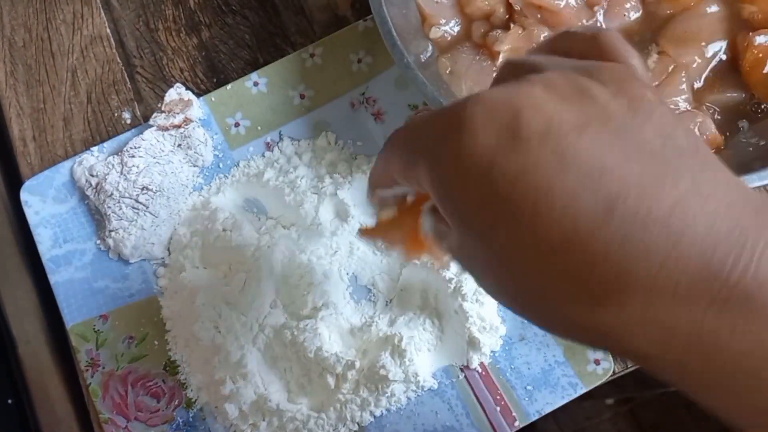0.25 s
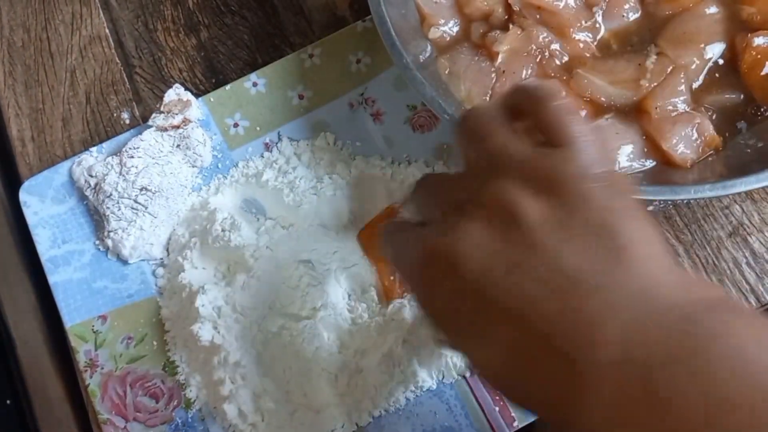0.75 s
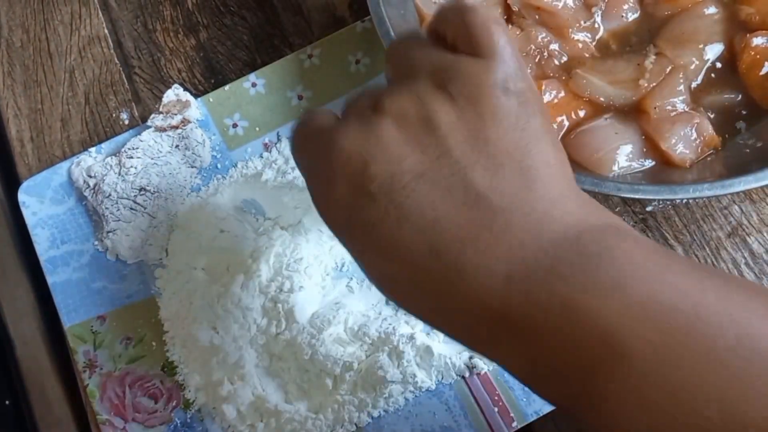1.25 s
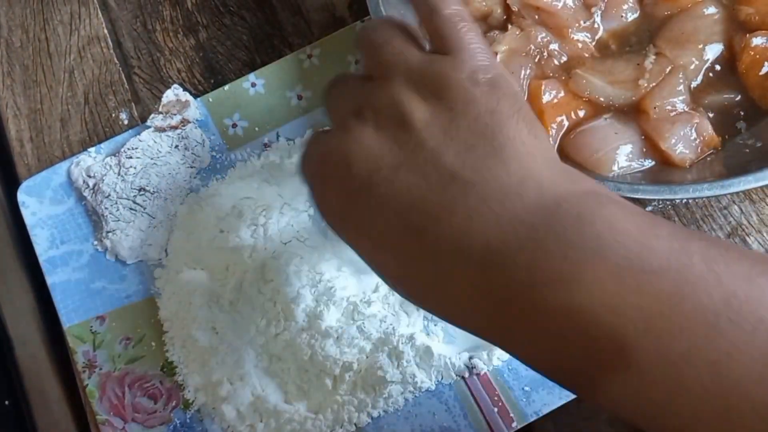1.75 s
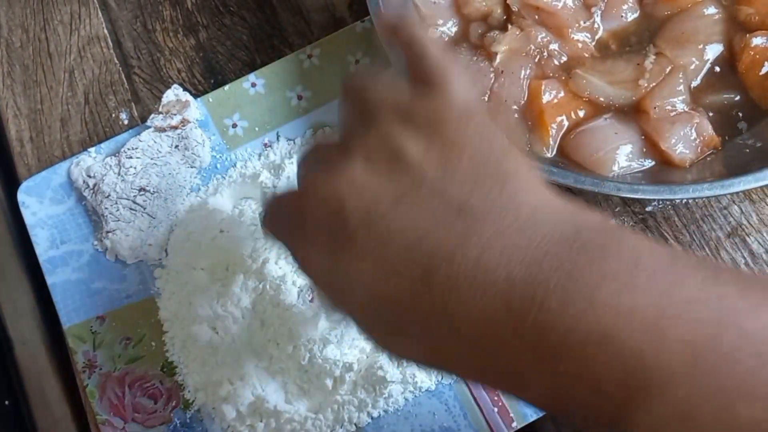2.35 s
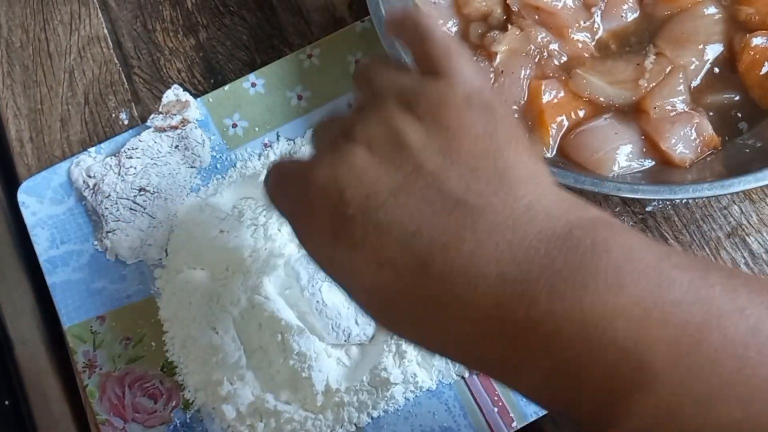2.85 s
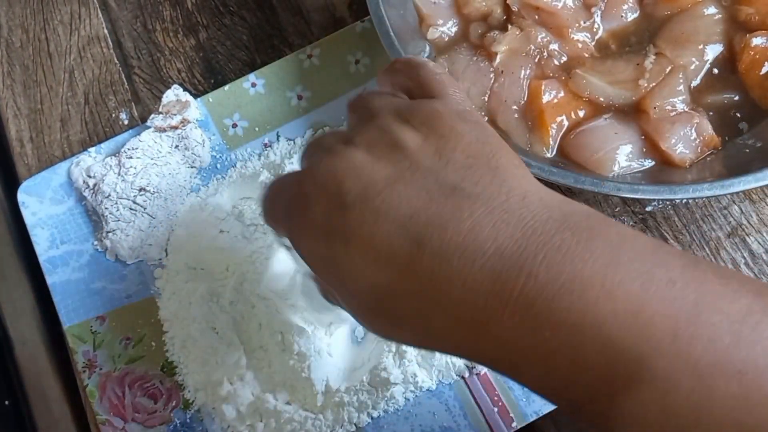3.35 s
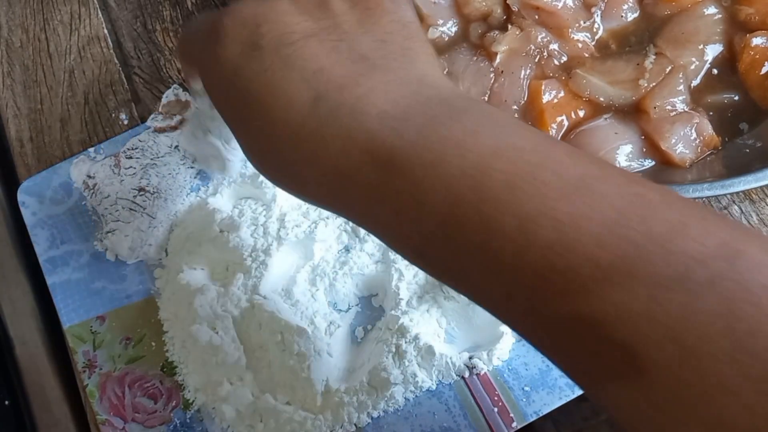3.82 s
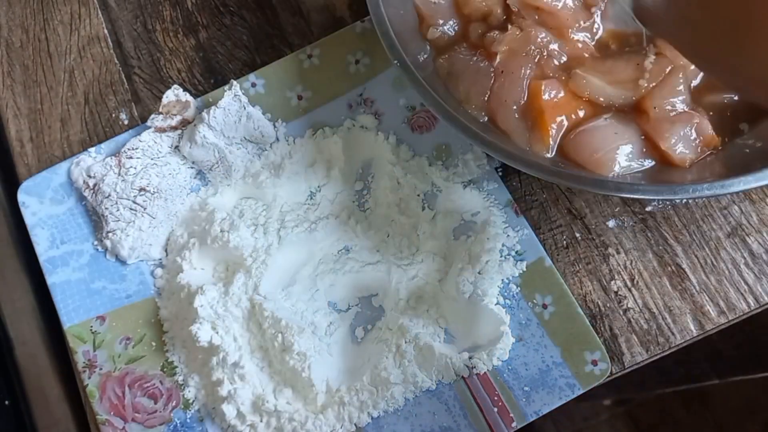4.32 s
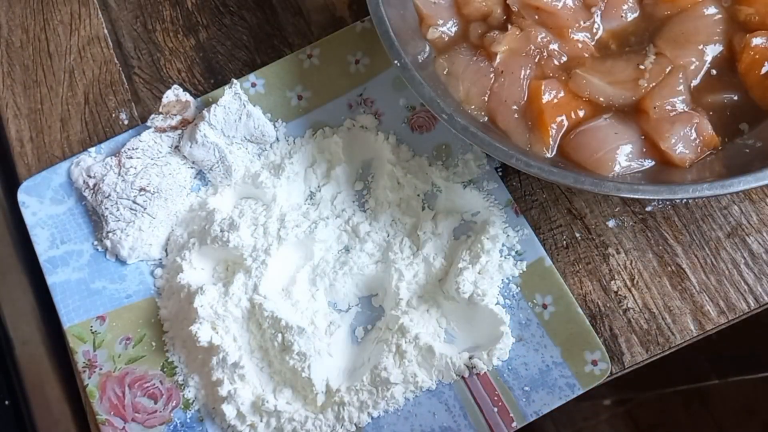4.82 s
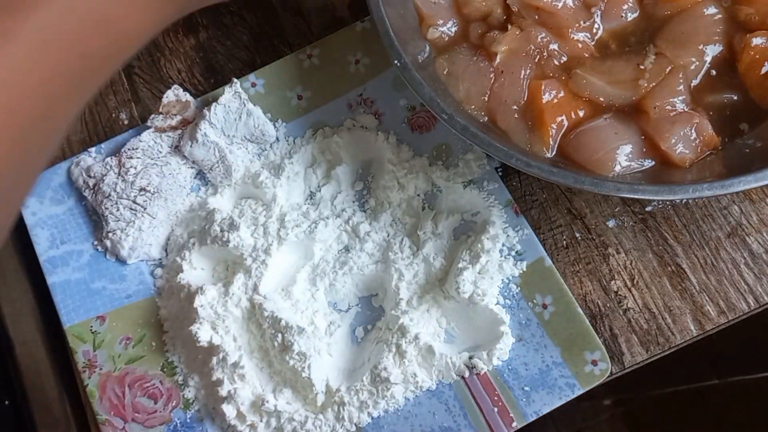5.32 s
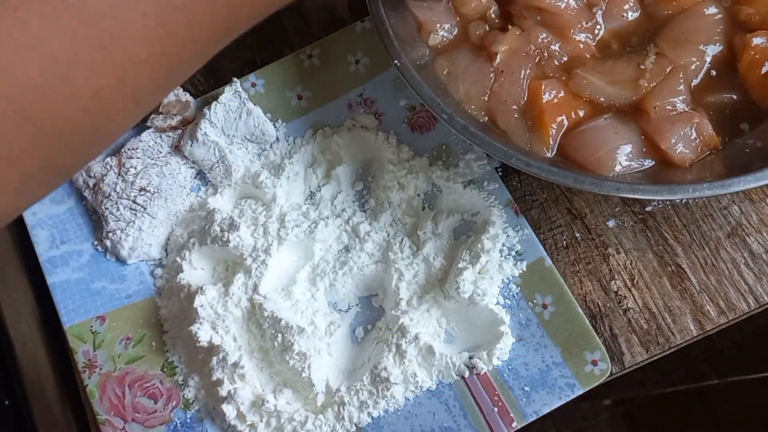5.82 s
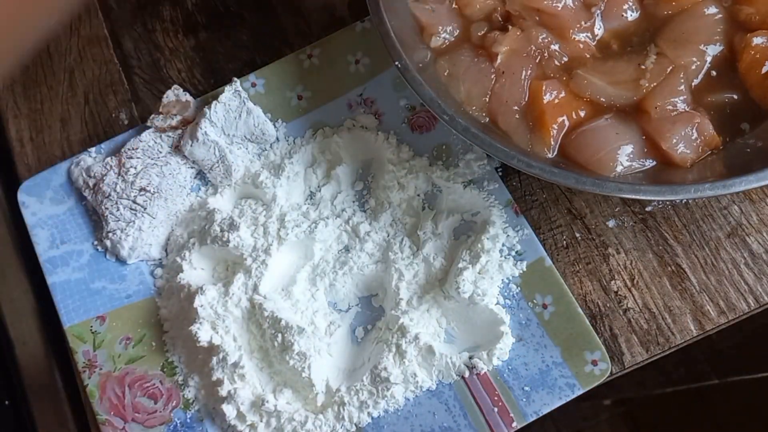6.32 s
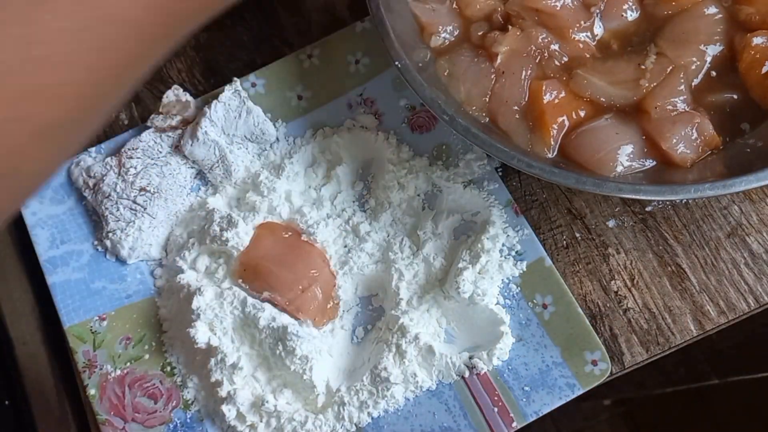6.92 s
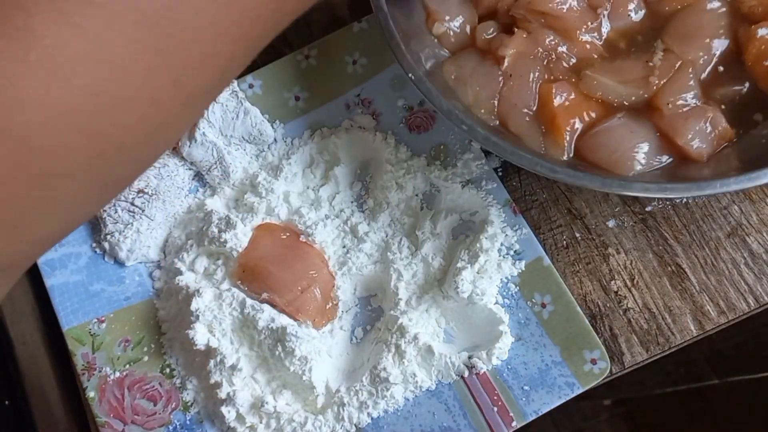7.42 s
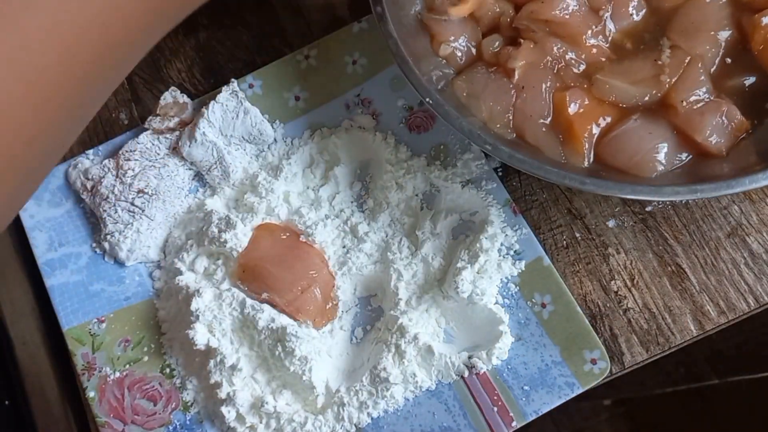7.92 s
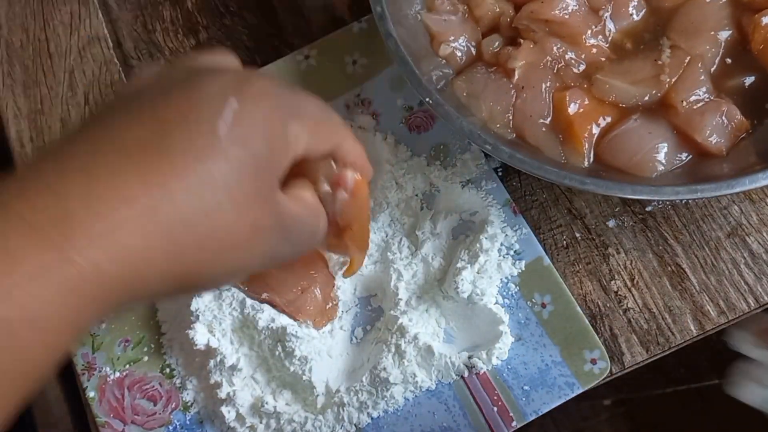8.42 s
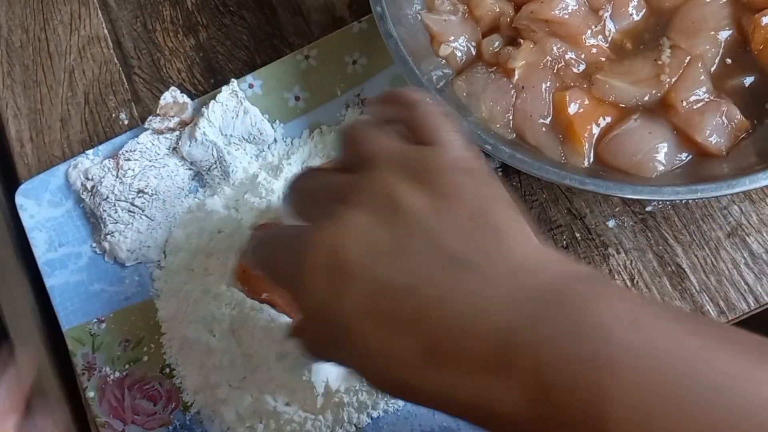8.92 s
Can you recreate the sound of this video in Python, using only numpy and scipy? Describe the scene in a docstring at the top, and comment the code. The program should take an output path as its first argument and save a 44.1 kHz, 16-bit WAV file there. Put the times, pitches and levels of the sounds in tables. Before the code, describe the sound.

Sharp snaps and crackles from a nearby pan of hot oil, over the low hum of a vehicle and traffic outside.

```python
"""A home kitchen, a stereo pair near a pan of hot oil that stands a little to the left. From the start steam
bubbles burst with a snap and a short ring, trapped water cracks, and the hard walls answer; outside,
tyres fade and traffic rumbles. By 3 s an engine has drawn near and drones through the walls. Past 5 s
a droplet sizzles away and the hum swells. Around 7 s the engine leaves, dull knocks come from the work
table, then another sizzle. The oil spits to the end."""
import sys
import numpy as np
from scipy import signal
from scipy.fft import rfft, irfft
from scipy.io import wavfile
from scipy.ndimage import uniform_filter1d

SR = 44100
rng = np.random.default_rng(int(sys.argv[2]) if len(sys.argv) > 2 else 0)


def master(y):
    """Save y as 16-bit WAV."""
    cut = np.clip(np.atleast_2d(y).T, -1, 1)
    pcm = np.round(cut * 32767)  # scale
    wavfile.write(sys.argv[1], SR, pcm.astype(np.int16))


N = 404397
BURST_N, ROOM_N = 2048, 16384  # samples in one dry burst, and in the room's answer
T, BURST_T = np.arange(N) / SR, np.arange(BURST_N) / SR
COLOUR_HZ = np.fft.rfftfreq(2 * ROOM_N, 1 / SR)


def amp(db):
    """Decibels to gain."""
    return 10 ** (np.asarray(db) / 20)


def unit_rms(x):
    """Scales to rms 1."""
    return x / np.sqrt(np.mean(x ** 2) + 1e-20)


def curve(points, hz):
    """Reads a table on a log-frequency axis."""
    f, value = np.transpose(points)
    return np.interp(np.log(hz + 1), np.log(f + 1), value)


def add(mix, s, sound):
    """Mixes a stereo sound in at time s."""
    part = mix[:, max(round(s * SR), 0):][:, :sound.shape[1]]
    part += sound[:, :part.shape[1]]


def lean(left_db):
    """Gains that put the left microphone left_db above the right."""
    return amp([[left_db / 2], [-left_db / 2]])


def swell(peak_s, rise_s, fall_s):
    """A bell-shaped hump of height 1 that builds up to peak_s and dies away."""
    t = T - peak_s
    return np.exp(-.5 * (t / np.where(t < 0, rise_s, fall_s)) ** 2)


def wander(knots):
    """A slow drift through evenly spaced random values."""
    return np.interp(T, np.linspace(0, N / SR, knots), rng.standard_normal(knots))


# Diffuse sound at the pair, alike only in the bass: f/Hz, left-right correlation
COHERENCE = [(30, 0.98), (130, 0.94), (250, 0.79), (500, 0.61), (900, 0), (3000, 0), (15000, 0)]
def diffuse_noise(spectrum):
    """Coloured noise of rms 1 that reaches the microphones from all sides."""
    hz = np.fft.rfftfreq(N, 1 / SR)
    left, other = rfft(rng.standard_normal((2, N)))
    alike = curve(COHERENCE, hz)
    right = alike * left + np.sqrt(1 - alike ** 2) * other
    return unit_rms(irfft(np.array([left, right]) * amp(curve(spectrum, hz)), N))


# Reverberation between the hard walls: f/Hz, T60/s
ROOM_DECAY = [(600, 0.64), (1500, 0.4), (4000, 0.27), (10000, 0.26), (15000, 0.25)]
def kitchen(direct=0.11, early=0.58, early_s=0.0054, lead_s=0.00034):
    """Frequency response from one spot to the pair: direct sound, close reflections, a dying tail."""
    t = np.arange(ROOM_N) / SR
    reflections = rng.standard_normal((2, ROOM_N)) * (rng.random((2, ROOM_N)) < .25)
    hz, frame_s, bands = signal.stft(reflections, SR, nperseg=256)
    bands *= amp(-60 * frame_s / curve(ROOM_DECAY, hz)[:, None])
    response = signal.istft(bands, SR, nperseg=256)[1][:, :ROOM_N]
    response *= 1 + early * np.exp(-t / early_s)
    response /= np.linalg.norm(response, axis=1, keepdims=True)
    response[0, 0] += direct
    response[1, round(lead_s * SR)] += direct  # the right microphone is farther away
    return rfft(response, 2 * ROOM_N)


def at_microphones(sound, room, colour):
    """A short sound, coloured and carried across the room, with rms 1 over its first 30 ms."""
    wet = irfft(rfft(sound, 2 * ROOM_N) * room * colour)[:, :ROOM_N]
    return wet / np.sqrt(np.mean(wet[:, :round(.03 * SR)] ** 2))


# Still air of the kitchen: f/Hz, relative density/dB
AIR_COLOUR = [(290, -39), (500, -3.5), (1420, -6), (1770, -15), (1930, 1), (2810, -5.5), (5310, -3),
              (6610, -6.5), (14900, -6), (16000, -21.5)]
def room_tone(level_db=-58.56):
    """A faint, steady hiss all around the microphones."""
    return amp(level_db) * diffuse_noise(AIR_COLOUR)


# Swells of traffic outside: peak t/s, road noise level/dB, rumble level/dB, half length/s
TRAFFIC_SWELLS = [(0, -49.5, -37.5, 0.34), (1.59, -53.5, -39, 0.087), (2.042, -64, -39, 0.1),
                  (3.06, -48.5, -38, 1), (4.796, -48.5, -44.5, 0.18), (6.22, -49, -38.5, 0.64),
                  (6.68, -60, -38, 0.094), (7.14, -62, -38, 0.082), (7.93, -56.5, -42, 0.29)]
# Road noise and rumble as they arrive indoors: f/Hz, relative density/dB
ROAD_COLOUR = [(130, -16), (180, -6), (210, 3), (260, -2), (320, -1.5), (420, -9), (700, -13.5),
               (1200, -20.5), (2500, -22), (6000, -38), (15000, -45)]
RUMBLE_COLOUR = [(20, -34), (38, -30), (50, -15.5), (68, -9.5), (75, 1), (90, 5), (101, 2), (111, 2),
                 (130, -1.5), (142, -17.5), (170, -22), (230, -47)]
def traffic(trim_db=-1, falloff=1.3, steady_s=0.11, waver_db=1.75):
    """Road noise and rumble swell and fade behind the walls."""
    peak_s, road_db, rumble_db, half_s = np.transpose(TRAFFIC_SWELLS)
    from_peak = (T[:, None] - peak_s) / half_s
    power_share = np.hypot(1, from_peak) ** (-2 * falloff)  # 1 at the top of each swell
    road = np.sqrt(power_share @ amp(road_db) ** 2) * diffuse_noise(ROAD_COLOUR)
    rumble = diffuse_noise(RUMBLE_COLOUR)
    rumble /= np.sqrt(uniform_filter1d((rumble ** 2).mean(0), round(steady_s * SR)))  # even out its level
    rumble *= amp(waver_db * wander(knots=70)) * np.sqrt(power_share @ amp(rumble_db) ** 2)
    return amp(trim_db) * (road + rumble)


# Low notes of the room under the traffic: peak t/s, level/dB, half length/s, f/Hz
BOOMS = [(.06, -41.5, 0.16, 73), (2.453, -33.5, 0.073, 92), (3.185, -33, 0.18, 93),
         (4.89, -30.5, 0.062, 93), (6.7, -39, 0.1, 103), (7.14, -46, 0.13, 78)]
def room_booms(trim_db=-1):
    """The rumble swells into booms on the room's low notes, the same at both microphones."""
    out = np.zeros(N)
    for s, db, half_s, hz in BOOMS:
        note = np.sqrt(2) * np.sin(2 * np.pi * (hz * T + rng.random()))
        out += amp(db + trim_db) * swell(s, half_s, half_s) * note
    return out


# Tyres far off in the street: f/Hz, relative density/dB
TYRE_COLOUR = [(200, -24), (330, -1.5), (470, 4), (700, -9), (1400, -5), (3000, -15.5), (8000, -55)]
def receding_tyres(start_db=-51.5, fade_s=0.11, falloff=0.33, fade_db_per_s=0.45):
    """A vehicle is already moving off: its tyre noise drops quickly, then lingers."""
    fade = amp(start_db - fade_db_per_s * T) / (1 + T / fade_s) ** falloff
    return fade * diffuse_noise(TYRE_COLOUR)


# Speed of the engine outside: t/s, firing rate/Hz
FIRING_RATE = [(2, 22.5), (2.8, 26.8), (3.4, 26.6), (3.8, 25.3), (5, 25), (5.3, 25.8), (6.7, 24.8),
               (7.4, 27.3)]
# Its wavering harmonics, and those that hum in the room: multiple of the firing rate, relative level/dB
DRONE_ORDERS = [(2, -22), (3, -8.5), (4, 0.5), (6, -9), (7, -33), (8, -11.5), (9, -11.5), (10, -18),
                (11, -13), (12, -13.5), (13, -23), (14, -21.5), (15, -25)]
HUM_ORDERS = [(5, -0.5), (8, -19)]
def passing_engine(drone_db=-47.5, hum_db=-43.5, waver_db=4.5, swell_db=8.5, cruise_hz=26.6,
                   load_db_per_hz=1, near_s=3.07, leaves_s=6.63, rise_db_per_s=9, fall_db_per_s=28):
    """An engine nears, lingers and leaves; its hum is stronger at the right microphone and swells once."""
    rate = np.interp(T, *np.transpose(FIRING_RATE))
    firings = np.cumsum(rate) / SR
    drone = np.zeros(N)
    for order, db in DRONE_ORDERS:
        gain = amp(db + waver_db * wander(knots=40))
        drone += gain * np.sin(2 * np.pi * (order * firings + rng.random()))
    drone *= amp(drone_db + load_db_per_hz * np.minimum(rate - cruise_hz, 0))  # quieter as it eases off
    hum = sum(amp(db) * np.sin(2 * np.pi * order * firings) for order, db in HUM_ORDERS)
    hum *= amp(hum_db + swell_db * swell(peak_s=5.49, rise_s=0.31, fall_s=0.31))
    away_db = np.maximum(rise_db_per_s * (near_s - T), fall_db_per_s * (T - leaves_s))
    return np.sqrt(2) * amp(-np.maximum(away_db, 0)) * (hum * lean(left_db=-4) + drone)


# Knocks at the work table: t/s, level/dB
KNOCKS = [(1.693, -50), (7.008, -45), (7.028, -56), (7.151, -56), (7.185, -51.5), (7.222, -47),
          (7.385, -50)]
# Their dull colour: f/Hz, relative density/dB
KNOCK_COLOUR = [(300, -5.5), (700, -11.5), (980, -3.5), (1250, -9), (1750, -5.5), (2500, -13.5),
                (6000, -15.5)]
def table_knocks(decay_s=0.009):
    """Soft, well damped taps that reach the microphones mostly by way of the walls."""
    out = np.zeros((2, N))
    colour = amp(curve(KNOCK_COLOUR, COLOUR_HZ))
    for s, db in KNOCKS:
        scuff = rng.standard_normal(BURST_N) * np.exp(-BURST_T / decay_s)
        add(out, s, amp(db) * at_microphones(scuff, kitchen(), colour))
    return out


# Droplets in the pan: peak t/s, level/dB
DROPLETS = [(5.36, -45), (7.7, -58), (7.88, -45.5)]
# Their hiss: f/Hz, relative density/dB
SIZZLE_COLOUR = [(500, -2.5), (1000, -4), (2500, 2), (5000, 2.5), (9000, -2), (13000, 1.5), (16000, -5)]
def sizzle(grain_db=2, rise_s=0.098, fall_s=0.084):
    """Each droplet boils off in a fine, grainy hiss."""
    grain = amp(grain_db * unit_rms(uniform_filter1d(rng.standard_normal(N), size=90)))
    power = sum((amp(db) * swell(s, rise_s, fall_s)) ** 2 for s, db in DROPLETS)
    return np.sqrt(power) * unit_rms(grain * diffuse_noise(SIZZLE_COLOUR))


# Hard cracks from the pan: t/s, direct envelope peak at the left microphone/dB, f/Hz
CRACKS = [(.695, -24, 5500), (.71, -25, 6000), (1.136, -19, 12200), (1.829, -32, 10700),
          (2.2466, -22, 6900), (2.3753, -25, 12000), (2.669, -26, 9300), (3.144, -26, 5000),
          (3.707, -29, 5000), (3.7883, -16, 12900), (4.0317, -31, 12500), (4.3315, -26.5, 13300),
          (4.412, -38, 4260), (4.939, -22.5, 12570), (6.1923, -27, 4400), (6.268, -27, 5200),
          (7.6866, -24, 5798), (8.807, -29.5, 12000), (9.0068, -24, 5400)]
def water_cracks(rise_s=0.00014, room_db=-3, lead_s=0.00034, right_db=-5):
    """Trapped water flashes to steam: a few hard cycles straight to the pair, the left microphone first."""
    t = np.arange(ROOM_N) / SR
    out = np.zeros((2, N))
    for s, db, hz in CRACKS:
        envelope = t / rise_s * np.exp(1 - t / rise_s)
        crack = amp(db) * envelope * np.sin(2 * np.pi * hz * t)
        direct = np.array([crack, amp(right_db) * np.roll(crack, round(lead_s * SR))])
        walls = irfft(rfft(crack, 2 * ROOM_N) * kitchen())[:, :ROOM_N]
        add(out, s - rise_s, direct + amp(room_db) * walls)
    return out


# Narrow resonances of the pan: f/Hz, full width at half power/Hz, relative level/dB
PAN_MODES = [(2168, 36, 5), (2440, 99, 2.5), (2647, 32, 10), (2987, 28, 6), (3650, 22, 7.5), (3450, 12, 9),
             (4040, 17, -29), (4280, 11, 1), (4600, 43, 2), (6330, 67, 5)]
def pan_resonance(trim_db=-4):
    """The frequency response with which the pan colours every bubble."""
    return 1 + sum(amp(db + trim_db) / (1 + 2j * (COLOUR_HZ - hz) / width) for hz, width, db in PAN_MODES)


# Snap of a tearing bubble film: f/Hz, relative density/dB
SNAP_COLOUR = [(300, -9), (700, -2), (1200, -1.5), (1800, 0.5), (2500, -1.5), (4500, 6), (6300, 6),
               (7500, 5.5), (9000, 6), (10500, 2), (12500, 7), (15500, -1.5)]
def film_snap(pitch, ring_excess_db, pan, click_s=0.000037, spray=0.056, spray_s=0.0069, scatter_db=3):
    """The film tears with a click and fine spray follows; each film has its own bumps in colour."""
    envelope = .5 * np.exp(-BURST_T / click_s) + spray * np.exp(-BURST_T / spray_s)
    snap = rng.standard_normal(BURST_N) * envelope
    snap[0] = 2  # the first click
    # brighter for a small bubble, and where the ring outweighs the snap
    tilt_db_per_octave = -1.5 + 1.5 * np.log2(pitch / 4000) + 0.14 * ring_excess_db
    treble_db = tilt_db_per_octave * np.log2(np.maximum(COLOUR_HZ, 3500) / 7000)
    bass_db = -4 * np.clip(np.log2(pitch / (COLOUR_HZ + 1)), 0, 1)  # it radiates less below its own pitch
    bumps_db = scatter_db * np.interp(COLOUR_HZ, np.linspace(0, SR / 2, 16), rng.standard_normal(16))
    colour = amp(curve(SNAP_COLOUR, COLOUR_HZ) + treble_db + bass_db + bumps_db)
    return at_microphones(snap, kitchen(direct=0.31), pan * colour)


# Uneven side modes of an open bubble: ratio to its pitch, relative level/dB
CAVITY_MODES = [(0.801, -13.5), (1.4, -24.5), (2, -14.5)]
def cavity_ring(pitch, ring_db, pan, rise_s=0.000088, decay_s=0.00261, glide=0.5, unsteady=0.61,
                scatter=0.106):
    """Escaping steam blows the open cavity like a tiny bottle; the unsteady flow widens the ring."""
    width_hz = 650 * pitch / 4000 * np.exp(0.06 * (ring_db + 43.5))  # harder bursts are more turbulent
    pole = np.exp(-np.pi * width_hz / SR)
    turbulence = rng.standard_normal(BURST_N) + 1j * rng.standard_normal(BURST_N)
    flutter = signal.lfilter([1], [1, -2 * pole, pole ** 2], turbulence)[::-1]
    flow = 1 + unsteady * flutter / flutter.std()
    rising_hz = pitch + glide * width_hz * (BURST_T / decay_s - .5)  # the pitch climbs as the hole opens
    phase = 2 * np.pi * np.cumsum(rising_hz) / SR
    tone = np.exp(1j * phase)
    for ratio, db in CAVITY_MODES:
        ratio *= 1 + scatter * rng.standard_normal()  # no two bubbles are alike
        if ratio * pitch < SR / 2:
            tone += amp(db) * np.exp(1j * ratio * phase)
    envelope = (1 - np.exp(-BURST_T / rise_s)) * np.exp(-BURST_T / decay_s)
    return at_microphones((flow * tone).real * envelope, kitchen(direct=0.39), pan)


def faint_bubbles(per_s=1.2, low_hz=3000, high_hz=9900, ring_db=-56, snap_db=-54.5):
    """Rows like those of BUBBLES for the small ones that burst at random in between."""
    when, height = rng.random((round(per_s * N / SR), 2)).T
    pitches = low_hz * (high_hz / low_hz) ** height
    return [(s, hz, ring_db, snap_db) for s, hz in zip(when * N / SR, pitches)]


# Steam bubbles bursting in the oil: t/s, cavity f/Hz, ring level/dB, snap level/dB
BUBBLES = [(0.056, 6770, -49, -50), (.234, 2510, -42.5, -46), (.246, 9400, -47.5, -45),
           (.55, 2770, -46.5, -42), (.559, 2430, -38.5, -44.5), (.585, 4460, -43, -41.5),
           (.604, 3050, -43.5, -42.5), (0.691, 5040, -41.5, -44), (.709, 5370, -48, -44),
           (.748, 4040, -42, -43), (.915, 3680, -45.5, -47.5), (1.111, 5360, -37.5, -47),
           (1.136, 6100, -40, -41), (1.157, 6300, -40.5, -60), (1.157, 3100, -42.5, -44.5),
           (1.223, 2360, -44, -44), (1.447, 2880, -43, -46.5), (1.481, 8100, -57, -50),
           (1.626, 3330, -37.5, -44.5), (1.63, 2490, -42, -50), (1.656, 6730, -46.5, -54),
           (1.691, 2750, -43, -39.5), (1.828, 4880, -38.5, -42), (1.972, 4290, -40, -44),
           (2.204, 5920, -46, -56), (2.244, 2590, -44.5, -41.5), (2.311, 4700, -43, -42.5),
           (2.349, 3780, -48, -48), (2.374, 5460, -41.5, -43.5), (2.668, 9160, -46.5, -51.5),
           (2.794, 4050, -47, -41.5), (2.828, 3240, -39.5, -46), (2.838, 2690, -46, -51),
           (2.915, 9000, -43.5, -44.5), (2.98, 4490, -40.5, -42.5), (3.037, 3350, -42, -42),
           (3.109, 7660, -44.5, -44), (3.141, 4540, -39.5, -45), (3.189, 3780, -37.5, -46),
           (3.225, 4770, -41.5, -42), (3.291, 2330, -43, -45), (3.43, 6350, -65, -40),
           (3.494, 4750, -62, -49.5), (3.521, 2630, -39.5, -48), (3.524, 5020, -43.5, -46.5),
           (3.658, 3220, -46.5, -44.5), (3.706, 4860, -38.5, -47.5), (3.786, 13600, -55, -54),
           (3.792, 2030, -39.5, -41), (3.793, 4130, -44, -61), (4.027, 3940, -34.5, -41.5),
           (4.08, 2360, -38, -43), (4.129, 4900, -38.5, -49), (4.413, 4100, -45, -44.5),
           (4.495, 5450, -55, -51.5), (4.729, 2230, -47.5, -51), (4.777, 7860, -46.5, -49),
           (4.812, 4220, -39.5, -47), (4.938, 4160, -36, -44.5), (5.06, 6500, -66, -50),
           (5.094, 4400, -44, -45), (5.178, 12400, -50, -53), (5.39, 2070, -40, -48),
           (5.455, 2940, -43.5, -47), (5.685, 3000, -44, -43), (5.752, 4140, -53, -49.5),
           (5.978, 3880, -44, -47.5), (6.19, 4440, -35.5, -52), (6.232, 4310, -46, -43.5),
           (6.263, 4470, -43.5, -48), (6.266, 5200, -41.5, -46), (6.37, 3280, -49, -44.5),
           (6.427, 3780, -40, -46), (6.523, 3550, -37.5, -47), (6.537, 2765, -41, -44),
           (6.942, 3510, -41, -43.5), (7.013, 4760, -42, -47.5), (7.223, 12500, -57, -50),
           (7.367, 4500, -50, -46), (7.383, 10200, -57, -48.5), (7.394, 3000, -44.5, -45.5),
           (7.54, 4730, -51, -49.5), (7.647, 7800, -48.5, -53), (7.672, 4980, -43, -39.5),
           (7.676, 2090, -50, -54), (7.684, 5800, -39, -51), (7.749, 4350, -46.5, -53),
           (7.835, 2486, -42.5, -45), (7.969, 2760, -42.5, -49), (7.972, 3400, -41, -45),
           (7.984, 6540, -45.5, -55), (8.063, 3080, -52, -50), (8.158, 6500, -55.5, -57),
           (8.207, 12000, -58, -58), (8.266, 12200, -56, -64), (8.539, 4800, -42, -48.5),
           (8.552, 6160, -43.5, -48), (8.608, 2620, -48.5, -48.5), (8.679, 4800, -52, -53),
           (8.721, 4100, -47, -54), (8.794, 2410, -44, -48), (8.807, 6340, -39, -51),
           (8.839, 4440, -49, -42.5), (8.895, 3580, -36, -42), (8.913, 2850, -42, -43.5),
           (8.951, 5840, -44, -45.5), (9.005, 5200, -53.5, -48.5)]
def spitting_oil(ring_trim_db=0.1):
    """Near the pair and to its left, each bubble snaps open and its cavity rings."""
    out = np.zeros((2, N))
    pan = pan_resonance()
    for s, pitch, ring_db, snap_db in BUBBLES + faint_bubbles():
        add(out, s, amp(ring_db + ring_trim_db) * cavity_ring(pitch, ring_db, pan))
        add(out, s, amp(snap_db) * film_snap(pitch, ring_db - snap_db, pan))
    return out * lean(left_db=1.06)


def scene():
    """The nearby pan over the room and the street; the hiss is nearly centred, a touch to the right."""
    pan = spitting_oil() + water_cracks()
    hiss = (room_tone() + sizzle()) * lean(left_db=-0.5)
    street = traffic() + room_booms() + receding_tyres() + passing_engine()
    return street + hiss + table_knocks() + pan


def record(dry, edge_hz=15650):
    """The recorder's band limit."""
    lowpass = signal.firwin(255, edge_hz, window=("kaiser", 8), fs=SR)
    return signal.oaconvolve(dry, lowpass[None], "same")


dry = scene()
out = record(dry)
master(out)
```